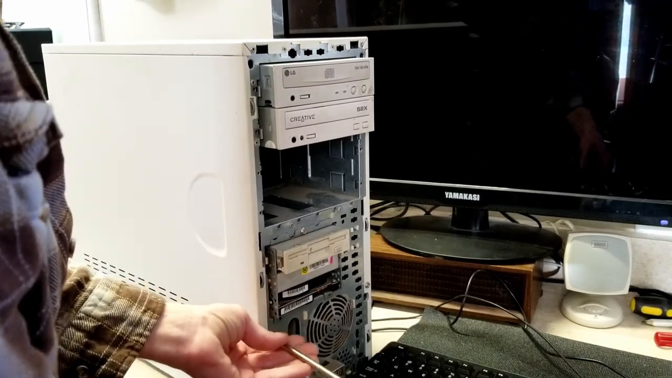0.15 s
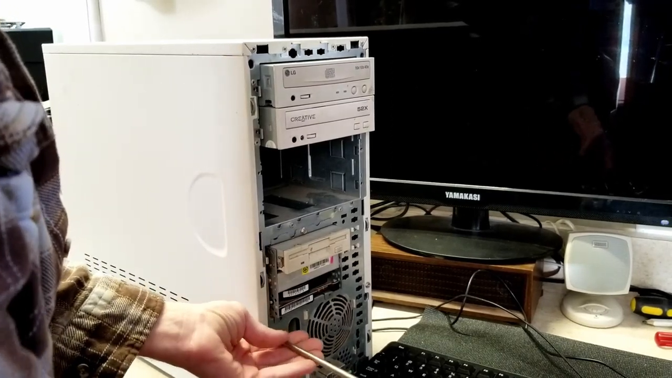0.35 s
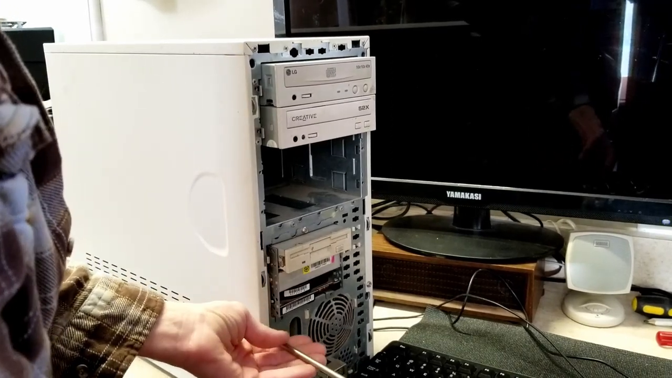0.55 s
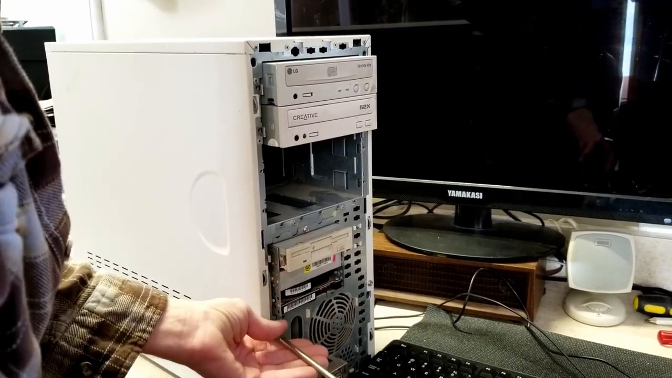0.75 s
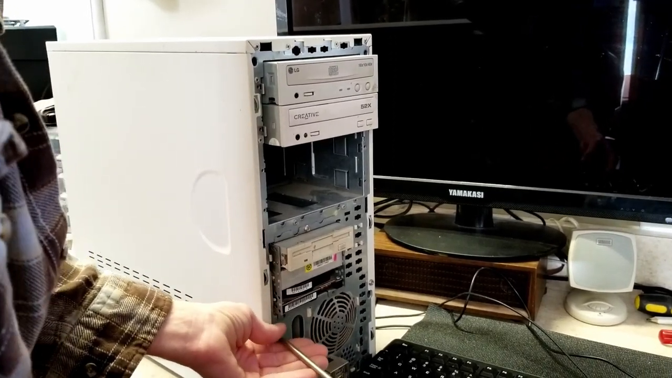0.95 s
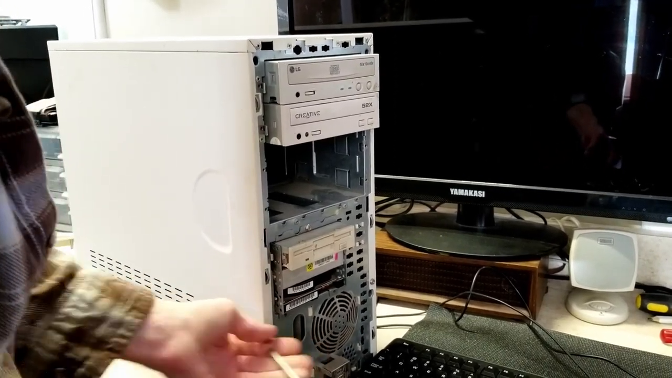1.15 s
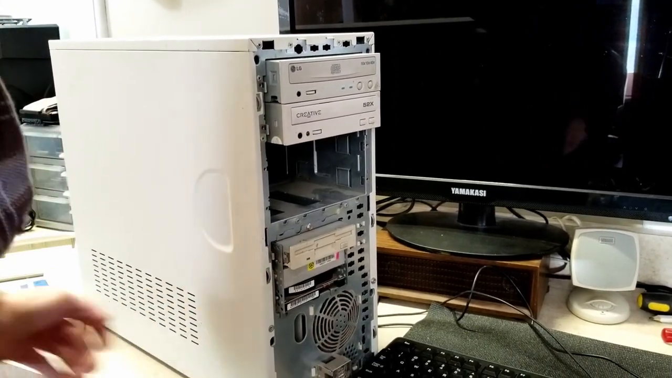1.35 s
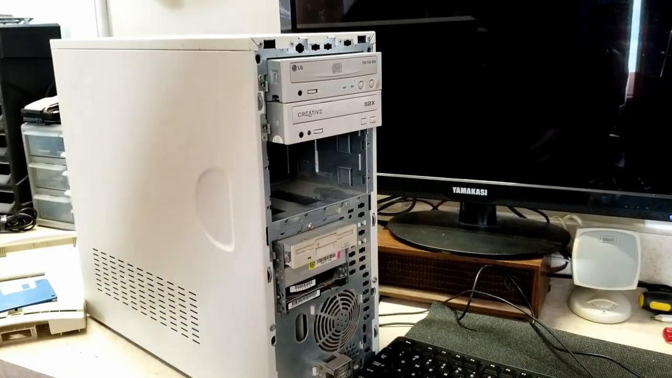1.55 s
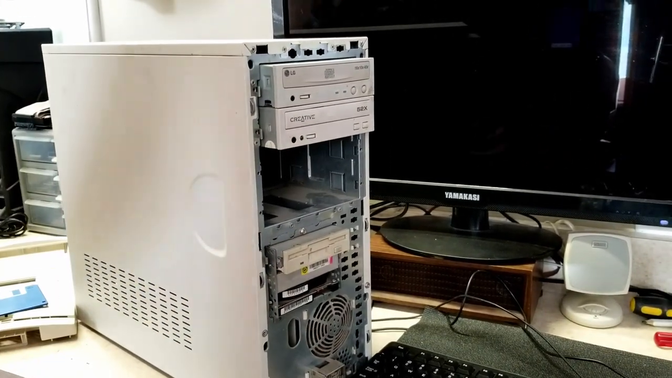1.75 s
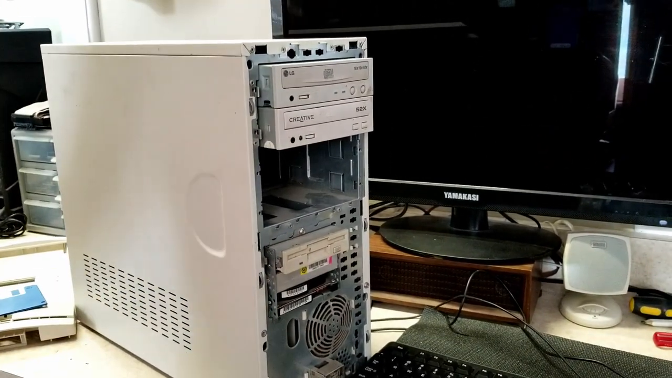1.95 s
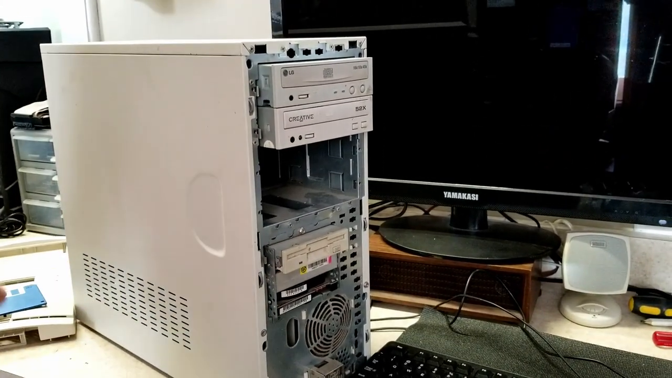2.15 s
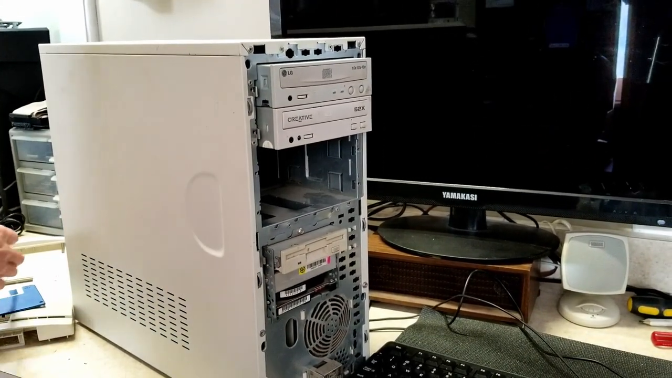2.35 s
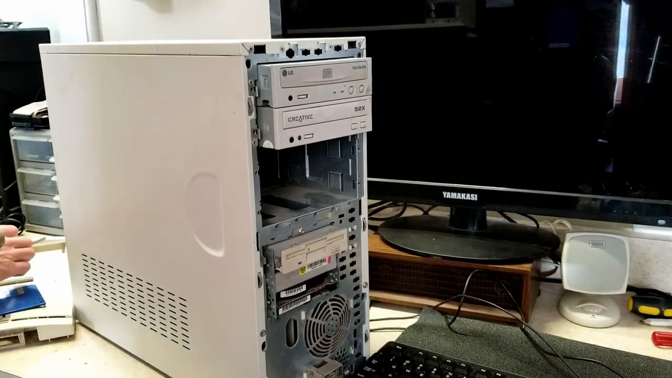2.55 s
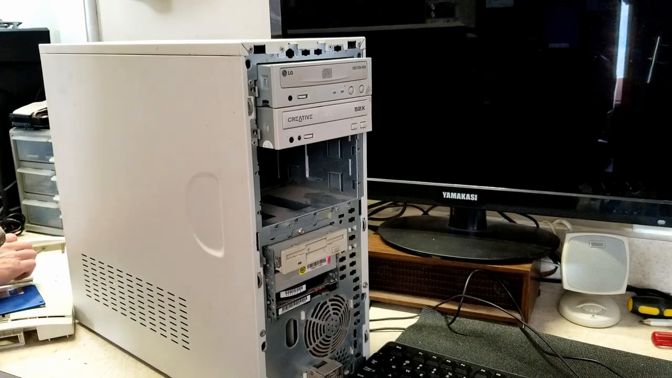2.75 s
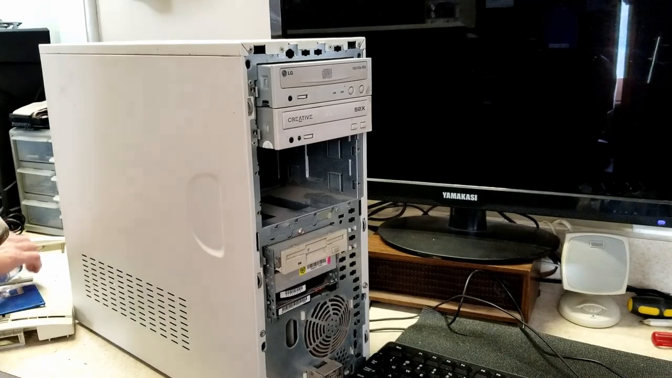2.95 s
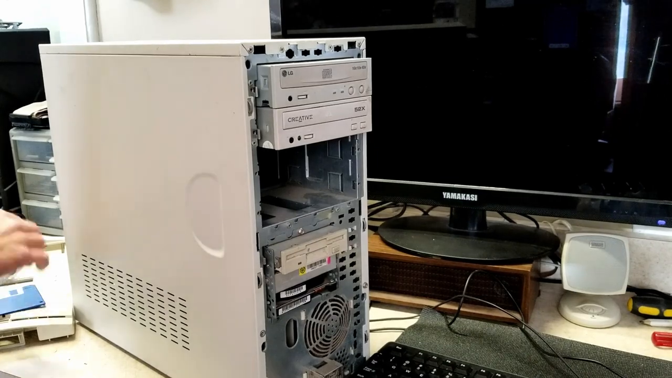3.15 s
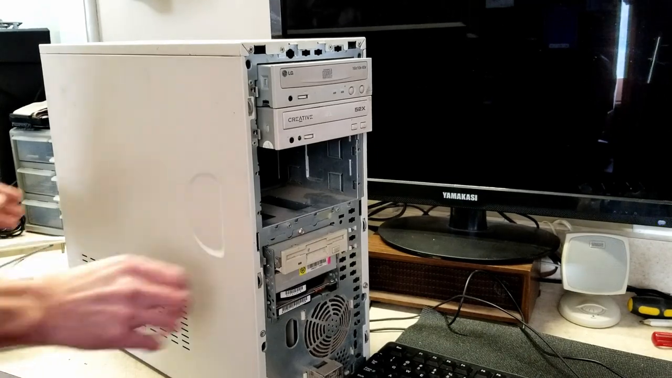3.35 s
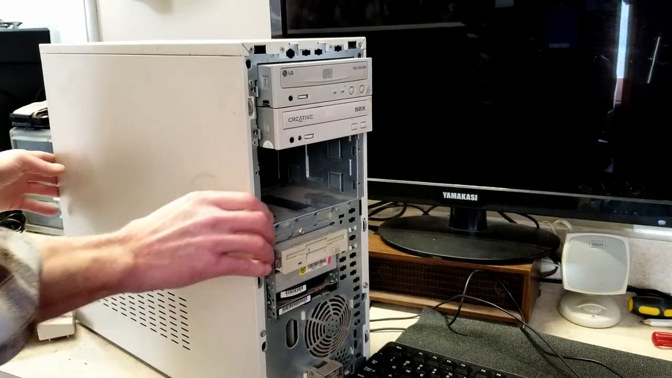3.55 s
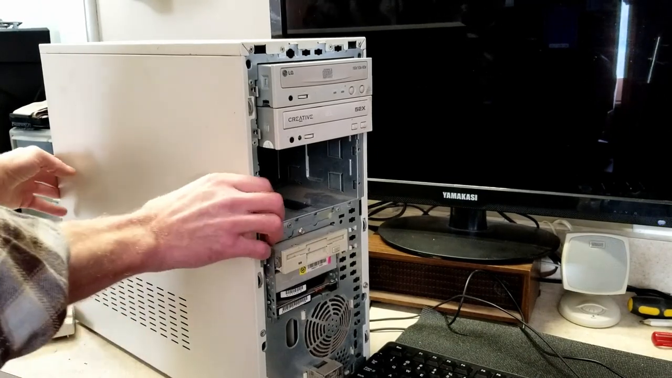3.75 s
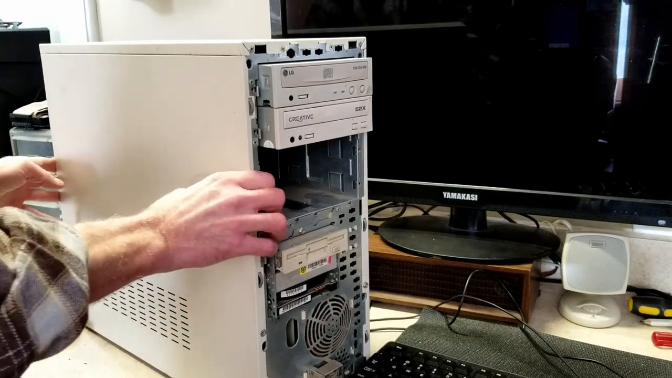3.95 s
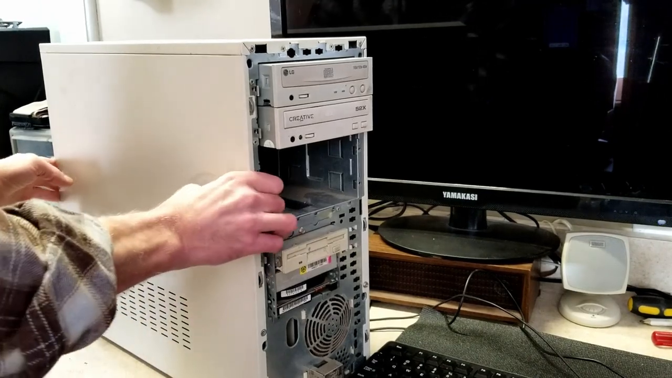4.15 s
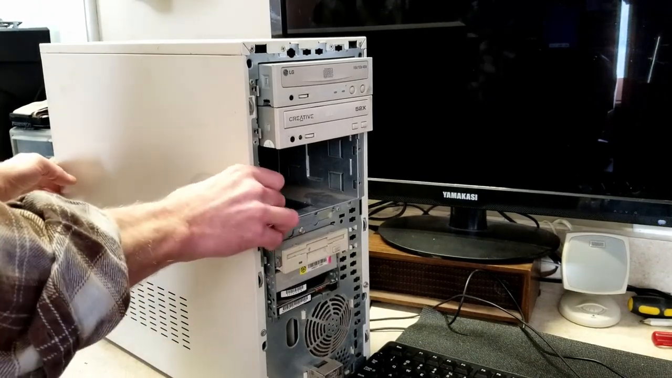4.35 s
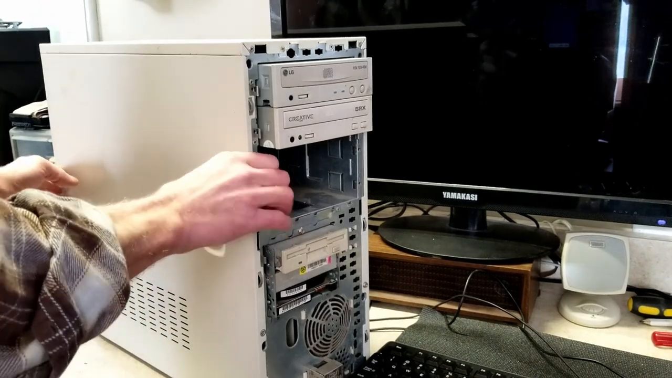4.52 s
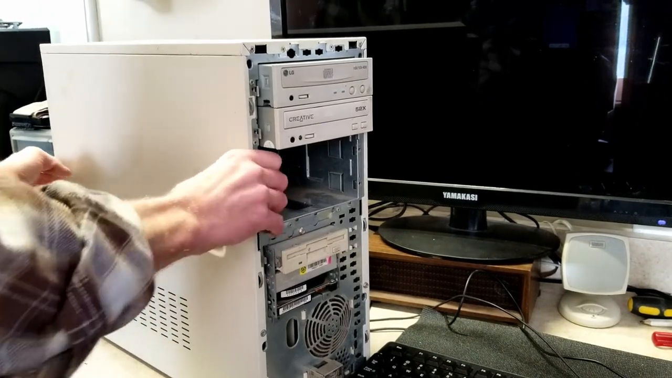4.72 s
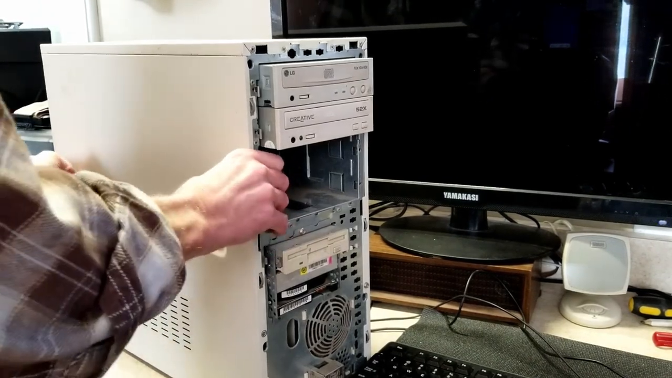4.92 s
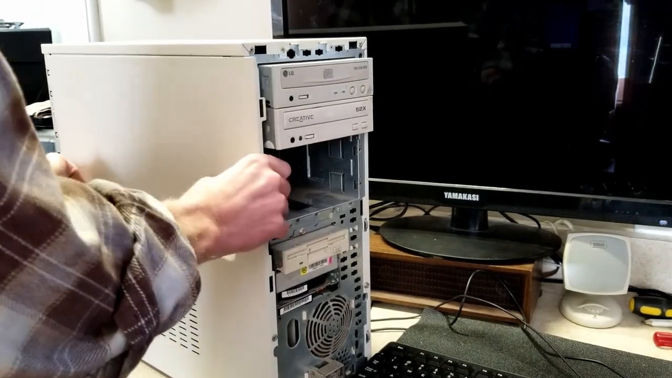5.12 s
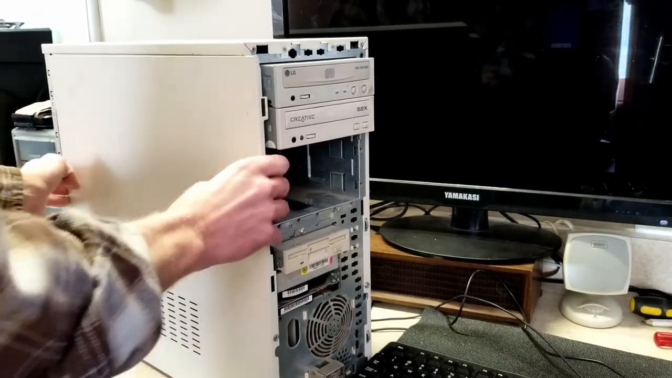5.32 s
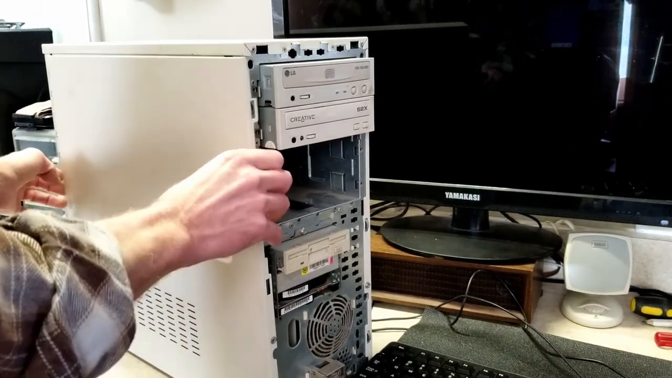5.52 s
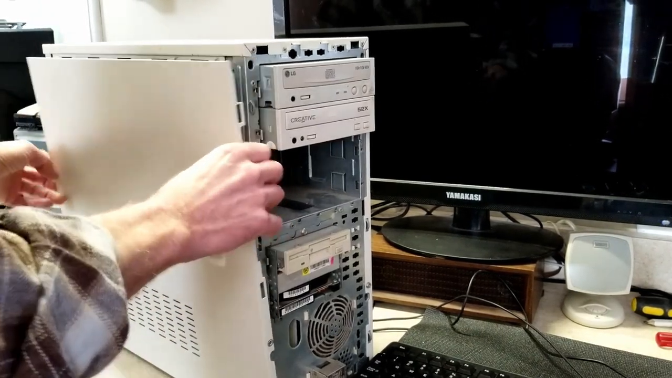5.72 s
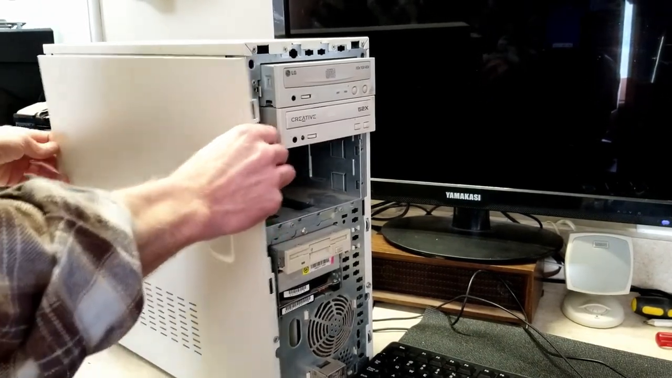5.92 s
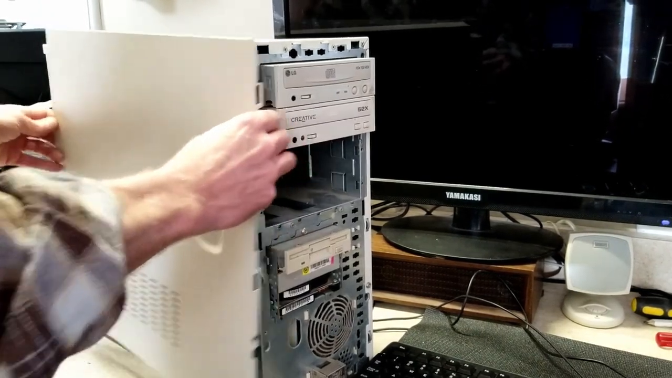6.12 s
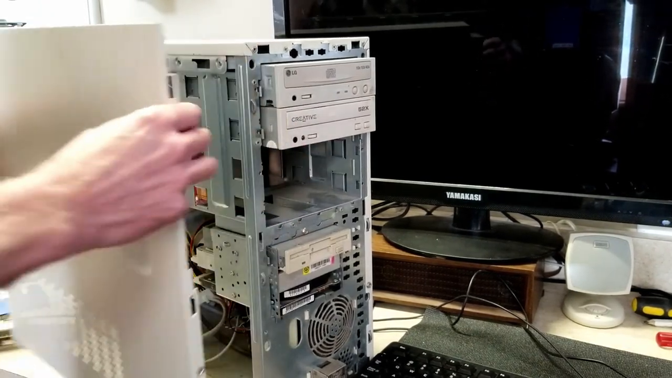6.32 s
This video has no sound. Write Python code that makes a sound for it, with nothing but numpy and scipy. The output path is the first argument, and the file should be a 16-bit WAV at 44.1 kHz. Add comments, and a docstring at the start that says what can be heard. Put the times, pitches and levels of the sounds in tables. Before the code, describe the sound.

A tight sheet-steel computer case panel clacks, jerks free with bangs and a brief metallic squeal, then clunks hollowly on its frame.

```python
"""Removal of a steel computer side panel

The panel is worked loose and slid off on a workbench in a small room, heard by two ports a hand's width apart.
Blows of tool, hands and steel excite cracks, diffuse ringing and bending modes; rubs are trains of tiny slips.
Stick-slip makes the tight panel squeal as it jerks out; the loose sheet then clunks hollowly on the frame.
Soft bumps and blows shake the bench top, over faint room rumble and microphone hiss."""
import sys
import numpy as np
from scipy import signal
from scipy.fft import rfft, irfft
from scipy.io import wavfile
from scipy.ndimage import uniform_filter1d

SR = 44100
rng = np.random.default_rng(int(sys.argv[2]) if len(sys.argv) > 2 else 0)


def store_wav(level_fs):
    """Save 16-bit WAV to argv[1]."""
    pcm = np.round(np.clip(np.atleast_2d(level_fs), -1, 1) * 32767)
    wavfile.write(sys.argv[1], SR, pcm.T.astype(np.int16))


N = 285768
SIZE = 32768  # samples in one contact's sound
T, HZ = np.arange(SIZE) / SR, np.fft.rfftfreq(SIZE, 1 / SR)
FREED_S = 4.5  # the panel leaves its catches
FIRM_DB = -30  # clang level of a firm blow

# Blows on the case and panel, relative levels:
# start_s, clang_db, hardness_db_per_octave, kind
BLOWS = [(0.437, -65.5, -1.5, "tap"), (0.486, -52, 0.3, "tap"), (0.583, -57.5, 0.95, "tick"),
         (0.666, -55, -0.5, "tick"), (1.103, -68, 2.5, "tap"), (1.575, -58.5, 2.2, "tap"),
         (1.974, -44.5, 0.7, "drop"), (2.036, -38.5, -0.3, "drop"), (2.676, -30, 2.06, "clack"),
         (2.681, -30.5, -1, "jerk"), (2.736, -30.5, -0.5, "clack"), (2.79, -41.5, -1, "knock"),
         (2.929, -35.5, -0.04, "knock"), (2.981, -42.5, -0.9, "clack"), (3.018, -34.5, 0.9, "knock"),
         (3.09, -45, -1, "knock"), (3.151, -53.5, -1, "knock"), (3.606, -45.5, -2.5, "knock"),
         (3.656, -46, -1, "knock"), (3.708, -47, 1.5, "knock"), (3.761, -38, -1, "clack"),
         (3.775, -26, 2.6, "jerk"), (3.864, -25, -0.9, "jerk"), (3.896, -28, 0, "jerk"),
         (4.0605, -20, 0.8, "jerk"), (4.099, -31, -0.2, "clack"), (4.613, -66.5, 1.5, "tick"),
         (4.675, -50, 1.5, "clunk"), (5.023, -29, -0.6, "clunk"), (5.032, -32, 1, "boom"),
         (5.184, -35, -1.57, "clunk"), (5.502, -37, 0.5, "boom"), (5.519, -35, -0.5, "clunk"),
         (5.563, -49, 0, "boom"), (5.675, -67, 5, "clunk"), (6.008, -18.5, 0.86, "clunk"),
         (6.022, -29.5, -1.2, "clack")]
# Kinds of blow. tick: tool tip on steel; tap: dull touch on the case; drop: tool put down; clack: steel meets
# steel; knock: case rocks and rattles; jerk: panel jumps in its catches; clunk: loose sheet hits the frame;
# boom: loose sheet flexes. Columns, with the first four relative to the clang and t60 nominal:
# boom_db, body_db, edge_db, fizz_db, ring_t60_s, crack_db, panel_modes_db, struck_note_hz, bench_thud_db
BLOW_KINDS = {"tick": (-12, -6, 7.5, 5, .23, -5, -13, 2600, -75),
              "tap": (-9, 9, -18, -21, .2, 1, -3, 700, -66),
              "drop": (-15, -8, 3.5, -3, .43, -3, -4, 1580, -58),
              "clack": (-8, 0, -3, -12, .39, -3, -5, 1140, -47),
              "knock": (-2.5, .5, -9, -25, .32, -2, -11, 1050, -48),
              "jerk": (-16, -3, -16, -34, .36, -1, -14, 1350, -44),
              "clunk": (-2, 4, -5.5, -9, .3, -5, -3, 630, -46),
              "boom": (4, 8, -10, -16, .29, -7, 4, 270, -47)}
RING_LOSS = 0.16  # dB of ring time lost per dB that a blow is heavier than a firm one


def blows(wash_db=2, crack_db=3, modes_db=-18, note_db=5, note_width=0.17, ripple_db=2.5):
    """Impact excitation: a blow cracks, rings sheet and room, and bends the panel; heavy blows die away faster."""
    out = np.zeros((2, N))
    crowd_db = ripple_db * ripple()
    for s, clang_db, hardness, kind in BLOWS:
        *tints, t60, hard_db, bend_db, note_hz, _ = BLOW_KINDS[kind]
        struck_spot_db = note_db * hump(note_hz, note_width * note_hz)
        gain = colour(s, clang_db, tints, hardness) * amp(crowd_db + struck_spot_db)
        ring_t60 = t60 * amp(RING_LOSS * (FIRM_DB - clang_db))
        strike = amp(wash_db) * wash(ring_t60) + amp(crack_db + hard_db) * crack(s)
        coloured_strike = irfft(rfft(strike) * causal(gain))
        add(out, s, coloured_strike + amp(modes_db + bend_db) * bending(gain))
    return out


def crack(s, held_lead_s=.00017, free_lead_s=.00007, peak_s=0.0033, scatter=0.68):
    """Direct sound and first bounces off the bench: a brief chatter whose direct part reaches the left port first."""
    envelope = T / peak_s * np.exp(1 - T / peak_s)
    burst, *bounces = rfft(rng.standard_normal((3, SIZE)) * envelope)
    lead_s = held_lead_s if s < FREED_S else free_lead_s
    direct = np.array([burst, burst * np.exp(-2j * np.pi * HZ * lead_s)])
    treble = HZ / np.hypot(HZ, 600)
    pair = direct + scatter * treble * np.array(bounces)
    return irfft(pair * treble * amp(np.outer([.5, -.5], read(BALANCE, HZ))))


# Frequency dependence of the damping: frequency_hz, ring_time_factor
DAMPING = [(80, 1.1), (300, 1.046), (1000, 0.79), (3000, 0.93), (7000, 0.8), (14000, 0.66)]


def wash(t60, build_cycles=2.83, build_s=0.0023, bend=1.074):
    """Diffuse field: countless modes and echoes after one click; the bass builds up slowly and dies last."""
    noise, out = diffuse(HZ), np.zeros((2, SIZE))
    centres = np.geomspace(120, 12000, 6)
    for hz, share in zip(centres, np.eye(len(centres))):
        band = irfft(noise * np.interp(np.log(HZ + 1), np.log(centres), share))
        rise = 1 - np.exp(-T / (build_s + build_cycles / hz))
        band_t60 = t60 * read(DAMPING, hz)
        out += band * rise * np.exp(-np.log(1000) * (T / band_t60) ** bend)
    return out


# Bending modes of the panel, relative levels: pitch_hz, level_db, t60_s
PANEL = [(230.9, -2.5, 0.47), (279.3, -3, 0.13), (322.7, 2.5, 0.39), (338.5, -7.5, 0.61), (406.4, 0, 0.35),
         (472.6, -1, 0.33), (526.5, -1.5, 0.19), (619, -7.5, 0.14), (666.8, -1.5, .25), (739, -10, 0.51),
         (835, -12.5, 0.1), (913, -11.5, 0.47), (1008, -6.5, 0.42), (1140, -11.5, 0.55), (1250, -7, 0.44),
         (1317, -3, 0.3), (1507, -2.5, 0.12), (1630, -5, 0.1), (2200, -7, 0.14)]


def bending(gain, spread_db=1.73, build_s=0.0016):
    """Modal superposition: each panel mode is as strong as the contact is at its pitch."""
    out = np.zeros((2, SIZE))
    for (hz, db, t60), (size, side, turn) in zip(PANEL, rng.standard_normal((len(PANEL), 3))):
        # phase of the right port relative to the left
        apart = side * np.sqrt(2 * max(1 - read(ALIKE, hz), 0))
        ring = amp(db + spread_db * size) * np.interp(hz, HZ, gain) * np.exp(-np.log(1000) * T / t60)
        out += ring * np.sin(2 * np.pi * (hz * T + turn) + np.array([[0], [apart]]))
    return out * (1 - np.exp(-T / build_s))


# Bands describing a contact, in the order clang, boom, body, edge, fizz: from_hz, to_hz
BANDS = [(1000, 2400), (100, 400), (400, 1000), (3200, 7000), (8000, 15000)]
# Colour of the crowd of higher modes and room echoes: frequency_hz, level_db
SHEET = [(30, -10.5), (80, -8.5), (150, -7.5), (220, -3), (320, -2.5), (450, -3), (650, -2), (1150, -3.5),
         (2200, -1.5), (3600, -2.5), (6700, -1), (8300, -8), (12000, 0), (16000, -6.5)]
# Case resonances with the panel in its catches, and with it free: pitch_hz, width_hz, level_db
HELD_CASE = [(175, 74, 5.5), (403, 26, -6), (577, 54, 0.5), (860, 150, -1.5), (1124, 100, 4.5),
             (1658, 43, 1), (2300, 170, 0.5)]
FREE_CASE = [(245, 49, 2.5), (300, 37, 4), (365, 33, 3), (591, 42, -3), (680, 38, -1.5), (777, 37, 3),
             (1140, 170, 3)]


def colour(s, clang_db, tints, hardness):
    """Source-filter principle: kind and hardness set a contact's spectrum; sheet and case resonances shape it."""
    lo, hi = np.transpose(BANDS)
    centres = np.sqrt(lo * hi)
    tilt_db = hardness * np.log2(centres / centres[0])
    bandwidth_db = 10 * np.log10((hi - lo) / (SR / 2))
    density_db = clang_db + np.r_[0, tints] + tilt_db - bandwidth_db
    resonances = HELD_CASE if s < FREED_S else FREE_CASE
    case_db = sum(db * hump(hz, width) for hz, width, db in resonances)
    return amp(read(sorted(zip(centres, density_db)), HZ) + read(SHEET, HZ) + case_db)


def causal(gain):
    """Causality: the minimum-phase response of a gain curve, so that nothing sounds before the contact."""
    cepstrum = irfft(np.log(gain + 1e-9))
    cepstrum[1:SIZE // 2] *= 2
    cepstrum[SIZE // 2 + 1:] = 0
    return np.exp(rfft(cepstrum))


def hump(hz, width):
    """Resonance: a bell-shaped peak, given its full width at half height."""
    return 1 / (1 + (2 * (HZ - hz) / width) ** 2)


def ripple(width_hz=45):
    """Modal overlap: the crowd of high modes gives fine peaks and gaps that blur together in the treble."""
    knots = np.arange(0, SR / 2, width_hz)
    depth = np.clip(HZ / 1000 - .5, 0, 1) / np.sqrt(1 + (HZ / 5000) ** 2)
    return depth * np.interp(HZ, knots, rng.standard_normal(SIZE)[:len(knots)])


# Rubs, relative levels: start_s, length_s, clang_db, hardness_db_per_octave, kind
RUBS = [(0.009, 0.13, -73.5, -1, "brush"), (0.197, 0.25, -79, 0, "brush"), (0.506, .13, -65.5, -2, "slide"),
        (0.668, .044, -44, -0.9, "scratch"), (1.268, .06, -65.5, -2.5, "slide"),
        (1.561, 0.099, -47.5, -1.5, "scrape"), (1.832, 0.043, -68, 0.5, "brush"),
        (2.967, 0.037, -37.5, 0.5, "scrape"), (3.279, 0.22, -82, 1, "brush"),
        (3.534, 0.091, -63.5, 0.5, "drag"), (3.622, 0.15, -46, -2.2, "scrape"),
        (3.912, 0.039, -37.5, -0.5, "scrape"), (4.002, .037, -58, 1.5, "slide"),
        (4.111, 0.081, -33, 0.2, "scrape"), (4.413, 0.16, -65.5, 0, "slide"),
        (4.649, 0.032, -63, 1, "drag"), (4.674, 0.022, -50.5, -1.9, "slide"),
        (4.98, 0.078, -49, .5, "drag"), (5.313, .14, -63, 0, "slide"), (5.475, 0.039, -54, -1.5, "drag"),
        (5.76, 0.095, -60, -0.74, "slide"), (5.935, 0.061, -56.5, -2, "slide"),
        (5.977, .035, -47.5, 0, "slide"), (6.326, 0.13, -68, 3.6, "slide"), (6.33, 0.11, -69, 1.5, "brush")]
# Kinds of rub. brush: hand and sleeve on the case; scratch: tool tip; scrape: steel under load;
# drag: the sheet bows as it is pulled; slide: light gliding contact. Levels relative to the clang:
# boom_db, body_db, edge_db, fizz_db, slips_per_s
RUB_KINDS = {"brush": (14.5, 13.5, -9.5, -8, 2505), "scratch": (-28.5, -26, -4.5, -18.5, 400),
             "scrape": (-5, -0.5, -7.5, -15.5, 220), "drag": (21.5, 11, -1.5, -3, 600),
             "slide": (3, 2, 2.9, 2.3, 2400)}


def rubs(uneven_db=4, t60=0.35, level_db=1, direct_db=3, modes_db=-28, ripple_db=1.0, grip=0.59):
    """Friction as random slips, sparse on steel and dense under a hand, each ringing the case like a faint blow."""
    out = np.zeros((2, N))
    crowd = amp(ripple_db * ripple())
    for s, length, clang_db, hardness, kind in RUBS:
        *tints, slips_per_s = RUB_KINDS[kind]
        gain = colour(s, clang_db, tints, hardness) * crowd
        sizes = amp(uneven_db * np.minimum(rng.exponential(1, SIZE), 3))
        slips = (rng.random(SIZE) < slips_per_s / SR) * sizes
        pressure = np.sin(np.pi * np.minimum(T / length, 1)) + grip * (T < length)
        slips *= rng.choice([-1, 1], SIZE) * pressure
        # equal mean power however dense the slips
        slips *= np.sqrt(length * SR / (np.sum(slips ** 2) + 1e-9))
        ring = wash(t60) + amp(direct_db) * crack(s)
        response = rfft(ring) * causal(gain) + rfft(amp(modes_db) * bending(gain))
        rub = irfft(rfft(slips) * response) / np.sqrt(np.sum(ring ** 2) / 2)
        add(out, s, amp(level_db) * rub)
    return out


# Squeals, relative levels: start_s, driven_s, choked_after_s, level_db, roughness_at_3_khz, part
SQUEALS = [(3.776, 0.029, 0.7, -20, 0.12, "low tab"), (4.139, 0.1, 0.21, -40.5, 0.45, "low tab"),
           (4.142, 0.021, 0.3, -34.5, 0.37, "high tab"), (5.345, .07, .25, -67, 1.65, "rim")]
# Modes of the steel parts (low tab, high tab, rim) that friction sets singing, relative levels:
# pitch_hz, level_db, t60_s, left_minus_right_db, left_lead_rad
TABS = {"low tab": [(2689, -8.5, .85, -4, .8), (2862, 0, .41, 6, -.9), (10475, -33, .2, 5, -.7),
        (12022, -20, .17, 14, 2), (14036, -36, .2, 14, -.5)], "high tab": [(4519, -1.5, .29, 7, 1),
        (4548, -10, .35, 5, 0), (6042, 0, .29, 7, .4), (7733, -14, .33, -7, -1.5), (9283, -19, .2, 4, 0),
        (9549, -11, .26, 10, .5), (10831, -16, .25, 13, -2), (12021, -7, .24, 8, 1.8),
        (13370, -20, .2, 10, 0)], "rim": [(3230, 0, .2, 4, 0), (6450, -6, .2, 4, 0),
        (14250, -11, .2, 6, 0)]}


def squeals(level_db=1.0, rise_s=0.012, spread_hz=40, sharp=0.035, settle_s=.006):
    """Stick-slip pumps a part's modes up; they ring down as tones until the moving panel chokes them."""
    out = np.zeros((2, N))
    swell = np.sin(np.pi / 2 * np.minimum(T / rise_s, 1)) ** 2
    for s, driven, choke_s, drive_db, roughness, part in SQUEALS:
        for hz, db, t60, side_db, lead in TABS[part]:
            ring_down = np.log(1000) * np.maximum(T - driven, 0) / t60
            level = swell * np.exp(-ring_down - (T / choke_s) ** 6)
            # uneven slips and echoes make the tone flutter, the high modes most, differently at each port
            rough = roughness * np.sqrt(hz / 3000)
            half_width_hz = 15 + spread_hz * abs(rough)
            flutter = unit(irfft(diffuse(HZ) / (1 + ((HZ - hz) / half_width_hz) ** 4)))
            # contact stiffens the part, so the pitch starts slightly sharp and settles
            turns = hz * (T + sharp * settle_s * (1 - np.exp(-T / settle_s)))
            tone = np.sqrt(2) * np.sin(2 * np.pi * turns + np.array([[lead], [0]]))
            ports = unit(amp([[side_db / 2], [-side_db / 2]]))
            add(out, s, amp(drive_db + db + level_db) * level * ports * (tone + rough * flutter))
    return out


# Soft bumps against the bench, relative levels: start_s, level_db, pitch_hz, t60_s
THUDS = [(1.315, -51.5, 60, 0.29), (1.701, -46.5, 80.5, 0.35), (1.742, -46.5, 53.6, 0.52),
         (5.035, -33.5, 96, .45)]
# bench response to the blows: delay, ring time and pitch with the panel held or free
THUD_LAG_S, THUD_T60_S, THUD_HELD_HZ, THUD_FREE_HZ = .015, .6, 100, 75.6
THUD_GROWTH = .5  # dB of bench thud gained per dB of blow


def thuds(width=0.46, level_db=3):
    """Structure-borne sound: soft bumps and blows shake the bench top, lower after blows once the panel is free."""
    out = np.zeros((2, N))
    shakes = []
    for s, clang_db, _, kind in BLOWS:
        db = BLOW_KINDS[kind][-1] + THUD_GROWTH * (clang_db - FIRM_DB)
        hz = THUD_HELD_HZ if s < FREED_S else THUD_FREE_HZ
        shakes.append((s + THUD_LAG_S, db, hz, THUD_T60_S))
    for s, db, hz, t60 in THUDS + shakes:
        rumble = unit(irfft(diffuse(HZ) / (1 + (np.log((HZ + 1) / hz) / width) ** 4)))
        envelope = (1 - np.exp(-T / 0.015)) * np.exp(-np.log(1000) * T / t60)
        add(out, s, amp(db + level_db) * rumble * envelope)
    return out


# Spectrum of the still room and microphone hiss: frequency_hz, relative_density_db_per_hz
FLOOR = [(15, -33), (25, -2.5), (64, 5.5), (99, -4), (216, -2), (269, -12.5), (307, -2.5), (382, -13.5),
         (1510, -16), (2660, -20), (4100, -20), (5670, -18), (8490, -28), (12100, -13.5), (15800, -14.5)]


def floor(level_db=-64):
    """Stationary coloured noise: faint room rumble and microphone hiss."""
    hz = np.fft.rfftfreq(N, 1 / SR)
    return amp(level_db) * unit(irfft(diffuse(hz) * amp(read(FLOOR, hz)), N))


# Likeness of the two ports in a diffuse field: frequency_hz, correlation (0 to 1)
ALIKE = [(100, 0.74), (280, 0.98), (560, 0.53), (1000, 0.18), (1700, 0.2), (4000, 0.091), (12000, 0.055)]
# Level difference of the ports: frequency_hz, left_minus_right_db
BALANCE = [(200, 2), (2000, 0), (4000, -1), (6000, 6.5), (13000, 5.5)]


def diffuse(hz):
    """Spatial coherence: spectrum of white noise from all sides, on which the ports agree in the bass only."""
    a, b, c, d = rng.standard_normal((4, len(hz))) * np.sqrt(len(hz))
    left, other = a + 1j * b, c + 1j * d
    alike = np.clip(read(ALIKE, hz), 0, 1)
    pair = np.array([left, alike * left + np.sqrt(1 - alike ** 2) * other])
    return pair * amp(np.outer([.5, -.5], read(BALANCE, hz)))


def read(points, hz):
    """Logarithmic pitch scale: reads a table of (frequency_hz, value) on a log-frequency axis."""
    f, value = np.transpose(points)
    return np.interp(np.log(hz + 1), np.log(f + 1), value)


def amp(db):
    """Logarithmic level scale: decibels to amplitude gain."""
    return 10 ** (np.asarray(db) / 20)


def unit(x):
    """Mean power: scales to an rms of one."""
    return x / np.sqrt(np.mean(x ** 2) + 1e-20)


def add(mix, s, sound):
    """Linear superposition: mixes a stereo sound in at time s."""
    part = mix[:, max(round(s * SR), 0):][:, :sound.shape[-1]]
    part += sound[..., :part.shape[1]]


def suppress(x, depth_db=6, knee_db=9, soft_db=13.5):
    """Spectral noise suppression: bands near their own quiet level are turned down, which cuts the tails short."""
    z = signal.stft(x, nperseg=512, noverlap=384)[2]
    power = (abs(z) ** 2).mean(0)
    power = uniform_filter1d(uniform_filter1d(power, size=9, axis=0), size=5, axis=1)
    level = 10 * np.log10(abs(power) + 1e-20)
    over_db = level - np.percentile(level, 10, axis=1, keepdims=True)
    cut_db = depth_db * (1 - np.tanh((over_db - knee_db) / (2 * soft_db))) / 2
    return signal.istft(z * amp(-cut_db), nperseg=512, noverlap=384)[1][:, :N]


def scene():
    """Linear superposition of all the sounds at the two ports."""
    return blows() + rubs() + squeals() + thuds() + floor()


def record(dry, cut_hz=15950):
    """Noise suppression, then band limiting by a linear-phase low-pass filter."""
    low_pass = signal.firwin(511, cut_hz, window=("kaiser", 9), fs=SR)
    return signal.oaconvolve(suppress(dry), low_pass[None], "same")


dry = scene()
out = record(dry)
store_wav(out)
```